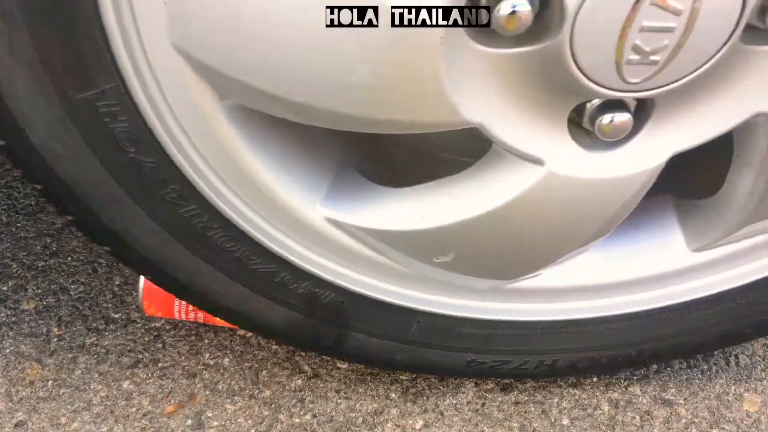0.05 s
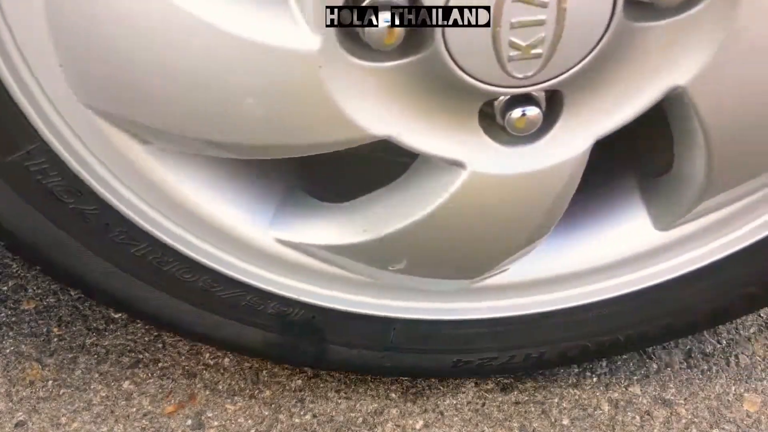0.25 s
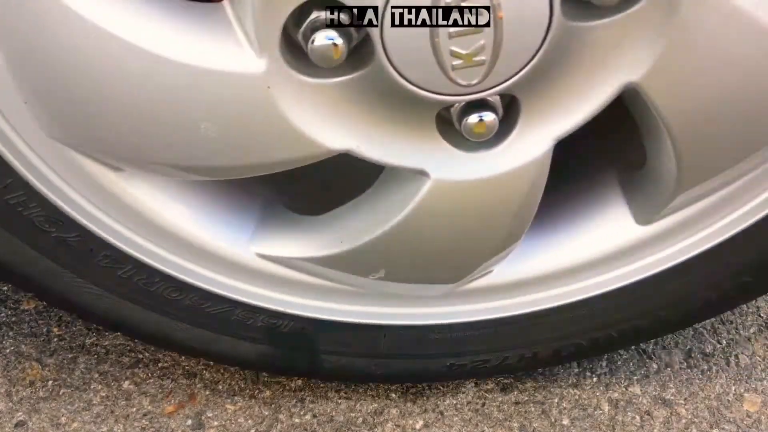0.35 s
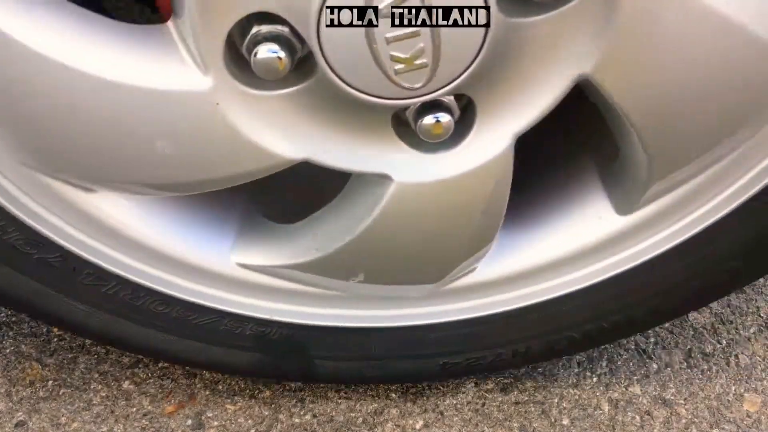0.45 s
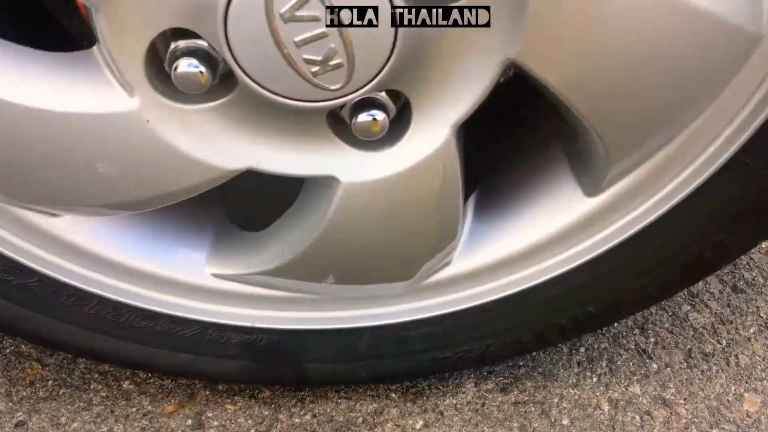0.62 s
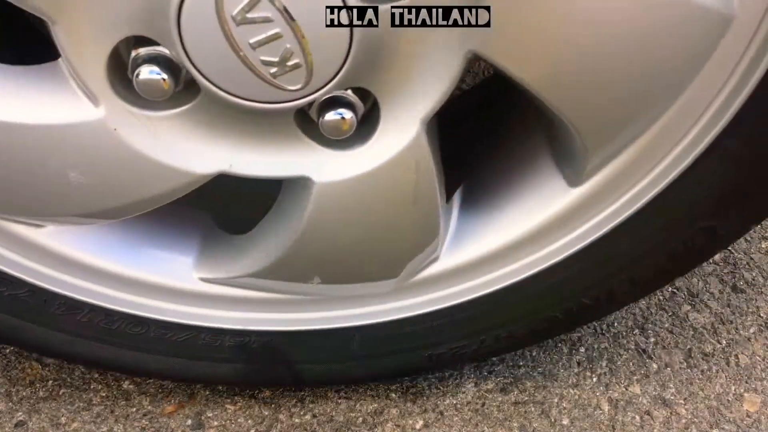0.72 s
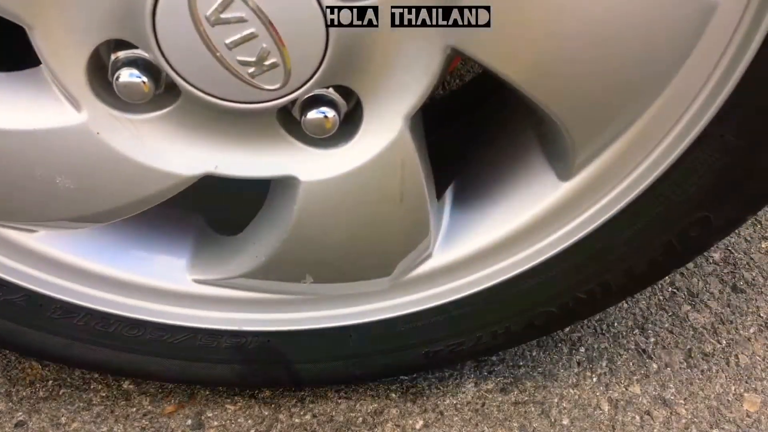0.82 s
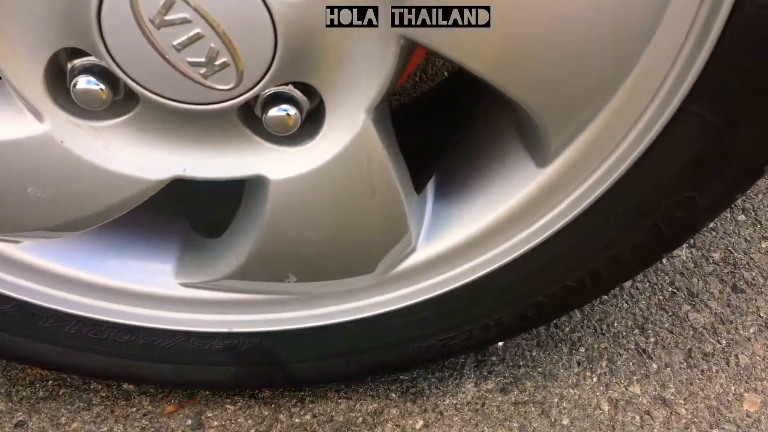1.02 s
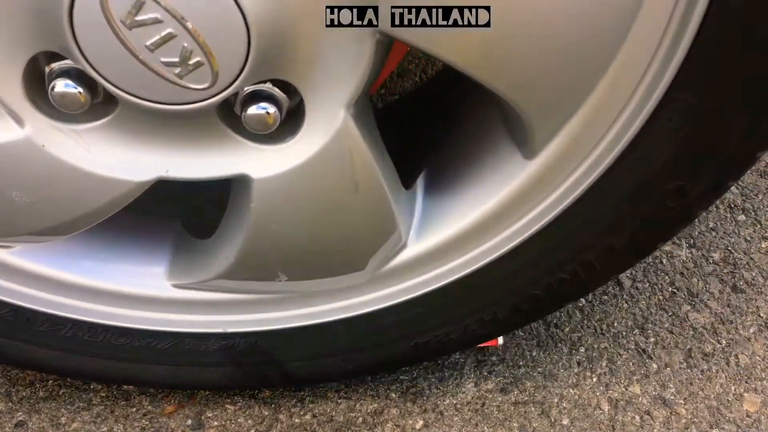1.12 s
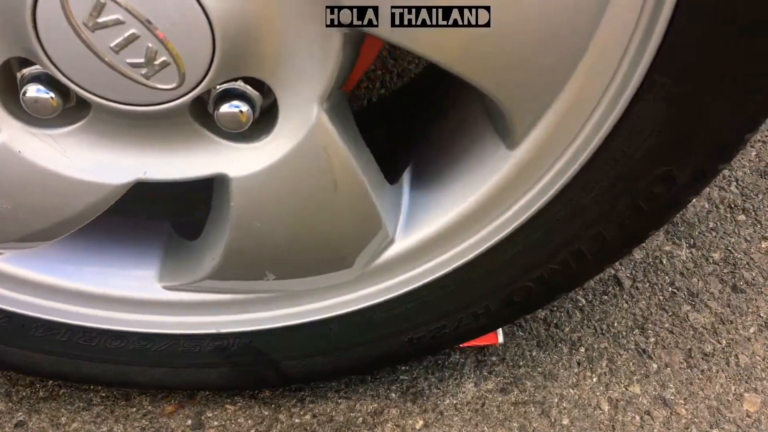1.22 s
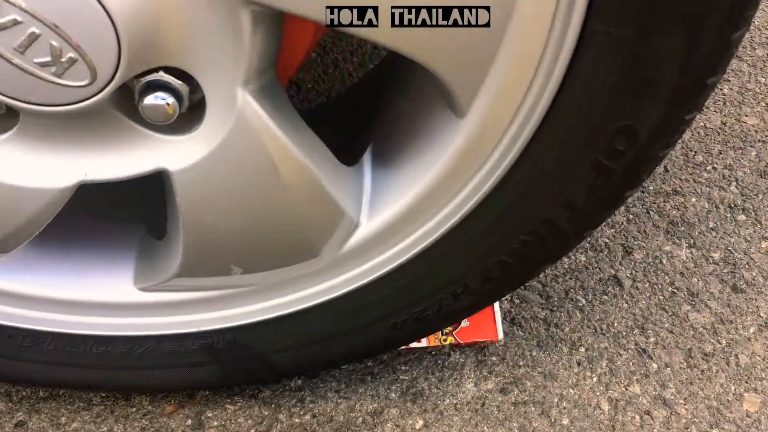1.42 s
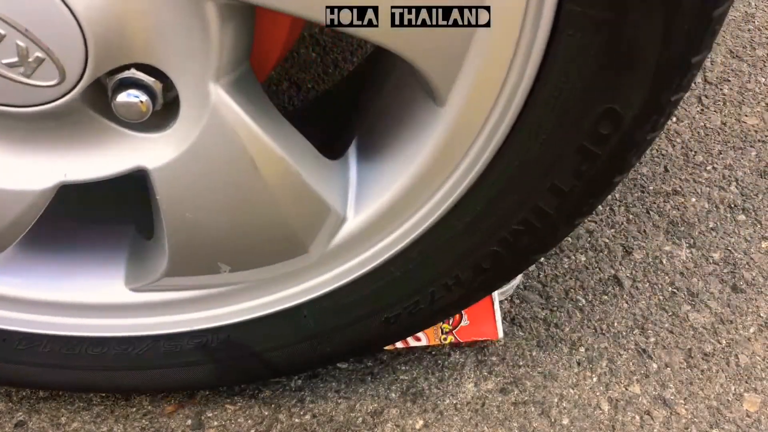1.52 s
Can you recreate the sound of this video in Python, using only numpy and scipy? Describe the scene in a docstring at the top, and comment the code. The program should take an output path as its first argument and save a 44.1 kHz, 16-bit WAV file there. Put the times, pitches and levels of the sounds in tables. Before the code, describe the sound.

Close beside a wheel on asphalt, a tyre squeezes a sealed packet; air rushes out ever harder, it bursts with a hard thump, then faint tread noise, grit and scattered crisp snaps follow over low rumble.

```python
"""Slow tyre on a sealed packet

A car tyre rolls slowly over a sealed packet on asphalt. The packet creaks (decaying resonant noise) and gives
a gulp (a rising sine); air hisses out of a seam ever harder (coloured and resonant noise). The walls cave in
with a few quick thumps (pressure pulses) that ring tyre and packet (damped modes). The tread rolls on over
grit (noise and random grains) and the crackling flattened packet, above the low rumble of the car."""
import sys
import numpy as np
from scipy import signal
from scipy.fft import rfft, irfft
from scipy.io import wavfile

SR = 44100
rng = np.random.default_rng(int(sys.argv[2]) if len(sys.argv) > 2 else 0)


def wrap_up_sound(samples):
    """Save the sound to the file named by the first command line argument, as 16-bit audio."""
    columns = np.atleast_2d(samples).T
    # keep every value between -1 and 1, then stretch to whole-number steps
    tamed = np.clip(columns, -1, 1)
    steps = np.round(tamed * 32767).astype(np.int16)
    wavfile.write(sys.argv[1], SR, steps)


N = 68355

# pressure pulses of the buckling walls: centre_s, peak_db, sigma_ms
BUCKLES = [(0.1146, -30, 0.64), (0.3542, -4, 0.15), (.3581, -8.5, 0.37), (0.3638, -6.5, 0.083),
           (0.3673, -4.5, 0.45), (0.374, -14.5, 0.48), (0.3903, -22, 0.48), (0.4041, -18.5, 0.71),
           (0.4113, -20, 0.73), (0.4463, -29, .6), (1.1066, -29.5, 0.24)]
# damped modes of tyre and packet: pitch_hz, level_db, t60_s
BODY_MODES = [(84.5, -29.5, 0.38), (140, -31, 0.13), (163, -25, 0.24), (203.5, -15, 0.13), (264, -24, 0.91),
              (301.3, -18.5, 0.13), (448.3, -18, 0.096), (520, -47, 0.029), (760, -18, 0.11),
              (1105, -8.5, 0.072), (1320, -8, 0.022), (2350, -5.5, 0.029)]
# spectrum of the tearing noise: frequency_hz, level_db
TEAR_SPECTRUM = [(200, -9), (1000, 16.5), (2400, 3.5), (4500, -15), (8000, -14), (16000, -13)]
# air leaving the seam: time_s, jet_db, whistle_db, seam_ringing_db
LEAK_LEVELS = [(0, -61, -82, -61), (.13, -48, -74, -53.5), (.19, -38.5, -41, -43.5), (.25, -32.5, -35, -41),
               (.31, -28.5, -33, -27.5), (.348, -28.5, -29, -31), (.372, -39, -39, -44),
               (.39, -49, -58, -60), (.415, -81, -83, -83)]
# broad spectrum of the air jet: frequency_hz, level_db
JET_SPECTRUM = [(150, -15), (500, -6.5), (1300, -6), (2000, -1.5), (3300, 0.5), (4500, -5.5), (5600, -4),
                (6700, 2.5), (7700, 0), (8700, 6.5), (10700, -8), (11300, -1.5), (13000, -2.5), (16000, -3)]
# resonances of the seam: pitch_hz, half_width_hz (of each of two stages), level_db
SEAM_MODES = [(1865, 66, -0.5), (3195, 180, -2.5), (3960, 206, 4), (5000, 63, 2.5), (6770, 70, -5),
              (7060, 45, 0), (8490, 42, -6), (8910, 160, -3.5), (9830, 200, 2.5), (10530, 80, 5),
              (10930, 98, -2)]
# top whistle of the seam: pitch_hz, half_width_hz (of each of two stages), level_db
WHISTLE_MODES = [(13900, 220, 1), (14700, 260, 3), (15400, 300, -13)]
# cracks of packet and grit: start_s, rattle_db, pitch_hz, decay_s, snap_db (relative to the rattle)
CRACKS = [(0.06, -38, 1970, 0.0096, -18), (.072, -31.5, 1790, 0.0078, -4),
          (0.0774, -33.5, 1840, 0.0064, -14), (0.094, -37, 1820, 0.0056, -14),
          (.114, -38, 1280, 0.0082, -18), (0.3666, -31.5, 5470, 0.0018, 3),
          (0.3825, -35.5, 2060, 0.0085, -15), (0.436, -44, 930, 0.023, 2),
          (0.5442, -52.5, 1290, 0.0033, 7.5), (0.7034, -43.5, 3100, 0.0066, -20),
          (0.793, -48, 2630, 0.016, 6), (.810, -49, 3000, 0.0041, 8.5), (0.8237, -43, 3070, .005, -8),
          (0.8383, -46, 3100, 0.026, -1), (0.8596, -42, 2900, 0.0069, -1), (0.985, -45, 2970, 0.0096, -19),
          (1.0757, -39, 1160, 0.0074, -22), (1.1053, -32, 1430, 0.0041, -13),
          (1.108, -36.5, 1080, 0.012, -30), (1.1514, -38.5, 2040, 0.007, 0), (1.2121, -28, 1920, .004, 0),
          (1.2185, -38, 1760, 0.014, -5), (1.271, -47.5, 3060, 0.011, -10),
          (1.4107, -44.5, 2930, .008, -18)]
# spectrum of a snap: frequency_hz, level_db
SNAP_SPECTRUM = [(300, -9), (1800, 0.5), (3900, 3.5), (5500, -10), (10000, -8), (16000, -10)]
# loudness of the rolling noise as heard, lower after the burst and back up near 0.7 s: time_s, level_db
ROLLING_NOISE_LEVELS = [(0, -44.5), (.1, -42.5), (.3, -46.5), (.42, -48.5), (.48, -49), (.6, -53.5),
                        (.655, -54), (.7, -45), (.85, -46), (.9, -48.5), (1.12, -45), (1.3, -47),
                        (1.42, -47.5), (1.55, -48)]
# spectrum of the tread: frequency_hz, level_db
TREAD_SPECTRUM = [(150, 7.5), (350, 1.5), (450, 6.5), (540, 2), (800, 1.5), (1000, -3), (1280, 5),
                  (1500, -2.5), (2200, -5.5), (3200, -7.5), (5000, -10.5), (7000, -17.5), (16000, -20.5)]
# spectrum of the grit: frequency_hz, level_db
GRIT_SPECTRUM = [(500, 17), (1500, -29.5), (3300, 12), (6000, -0.5), (16000, -39)]
# spectrum of the car's rumble: frequency_hz, level_db
RUMBLE_SPECTRUM = [(20, 0), (55, 1.5), (85, 3.5), (115, -3), (145, -2), (220, -4.5), (320, -17.5),
                   (700, -42.5)]

BUCKLE_LOW_HZ = 75
REBOUND_DB, REBOUND_DELAY_SIGMAS = -11, 3.1
TEAR_DB, TEAR_DECAY_S, TEAR_LEAD_S = -21.5, 0.0087, 0.00113
TEAR_GROWTH = 1.45  # dB of tear per dB of push
SEAM_FLICKER_DB, SEAM_FLICKER_PER_S = 5, 40
GULP_START_S, GULP_LENGTH_S = 0.1125, 0.0405
GULP_START_HZ, GULP_OCTAVES_PER_S = 212.5, 29
GULP_DB, GULP_FADE_DB_PER_S, GULP_OVERTONE_DB = -27.5, 74, -21
GULP_ATTACK_S, GULP_RELEASE_S = 0.0026, 0.0025
CRACK_RELATIVE_WIDTH, SNAP_DECAY_S = 0.38, 0.002
FLUTTER_DB, FLUTTER_PER_S = 1.5, 35.17
GRIT_PER_S, GRIT_SPREAD_DB, GRIT_DB, GRIT_DECAY_S = 710, 6.5, -12, 0.0031
RUMBLE_DB = -47.5
MIC_LOW_HZ, TOP_HZ = 29.2, 15900


def undb(db):
    """Level in decibels as an amplitude ratio."""
    return 10 ** (np.asarray(db) / 20)


def unit(x):
    """Normalisation to an rms of 1."""
    return x / np.sqrt(np.mean(x ** 2))


def clock():
    """Time of every sample in seconds."""
    return np.arange(N) / SR


def curve(table, column=1):
    """Amplitude envelope, interpolated linearly in dB over time."""
    rows = np.array(table)
    return undb(np.interp(clock(), rows[:, 0], rows[:, column]))


def colour(x, spectrum):
    """Spectral shaping, interpolated in dB over log frequency, to an rms of 1."""
    hz, db = np.array(spectrum).T
    bins_hz = np.maximum(np.fft.rfftfreq(N, 1 / SR), 1)
    gain = undb(np.interp(np.log(bins_hz), np.log(hz), db))
    return unit(irfft(rfft(x) * gain, N))


def resonate(x, hz, width):
    """Two-pole resonance with a gain of 1 at its centre; Q is at least 0.5."""
    b, a = signal.iirpeak(hz, max(hz / width, .5), fs=SR)
    return signal.lfilter(b, a, x)


def fade(start, decay):
    """Sudden onset and exponential decay."""
    age = clock() - start
    return (age >= 0) * np.exp(-np.maximum(age, 0) / decay)


def ring(x, response):
    """Linear response: convolution with an impulse response."""
    return signal.fftconvolve(x, response)[:N]


def noise():
    """White Gaussian noise."""
    return rng.standard_normal(N)


def walk(rate):
    """Random fluctuation: lines between Gaussian values drawn at a rate per second."""
    return np.interp(clock() * rate, np.arange(N), noise())


def band(hz, half_width):
    """Noise narrowed by two resonances in cascade, which steepens the flanks."""
    once = resonate(noise(), hz, 2 * half_width)
    return resonate(once, hz, 2 * half_width)


def collapse():
    """Impulsive excitation: a pressure pulse with a rebound; tearing starts just before; the pulse rings modes."""
    t = clock()
    ms = 1e-3
    push, rebound, tear_envelope = np.zeros(N), np.zeros(N), np.zeros(N)
    for centre_s, peak_db, sigma_ms in BUCKLES:
        age = (t - centre_s) / (sigma_ms * ms)  # in sigmas of the pulse
        push -= undb(peak_db) * np.exp(-.5 * age ** 2)
        rebound += undb(peak_db + REBOUND_DB) * np.exp(-.5 * (age - REBOUND_DELAY_SIGMAS) ** 2)
        tear_envelope += undb(TEAR_GROWTH * peak_db) * fade(centre_s - TEAR_LEAD_S, TEAR_DECAY_S)
    high_pass = signal.butter(1, BUCKLE_LOW_HZ, "high", fs=SR, output="sos")
    thump = signal.sosfilt(high_pass, push + rebound)
    modes = sum(undb(db - 60 * t / t60) * np.cos(2 * np.pi * hz * t) for hz, db, t60 in BODY_MODES)
    ringing = ring(push, modes) / (SR * ms)  # convolution integral with time in ms
    tear = tear_envelope * colour(noise(), TEAR_SPECTRUM)
    return thump + ringing + undb(TEAR_DB) * tear


def leak():
    """Turbulence and resonance: a swelling air jet rings the flapping seam and whistles at the very top."""
    rings = np.zeros(N)
    for hz, half_width, db in SEAM_MODES:
        flicker_db = SEAM_FLICKER_DB * walk(SEAM_FLICKER_PER_S)
        rings += undb(db + flicker_db) * band(hz, half_width)
    whistle = sum(undb(db) * band(hz, half_width) for hz, half_width, db in WHISTLE_MODES)
    jet = colour(noise(), JET_SPECTRUM) * curve(LEAK_LEVELS)
    whistle = unit(whistle) * curve(LEAK_LEVELS, column=2)
    rings = unit(rings) * curve(LEAK_LEVELS, column=3)
    return jet + whistle + rings


def gulp():
    """Cavity resonance: a shrinking pocket of air rings at a quickly rising pitch."""
    age = np.maximum(clock() - GULP_START_S, 0)
    held = np.minimum(age, GULP_LENGTH_S)  # stops the rise when the release begins
    pitch_hz = GULP_START_HZ * 2 ** (GULP_OCTAVES_PER_S * held) * (age > 0)
    phase = 2 * np.pi * np.cumsum(pitch_hz) / SR
    attack = np.minimum(age / GULP_ATTACK_S, 1)
    release = np.exp((held - age) / GULP_RELEASE_S)
    level = undb(GULP_DB - GULP_FADE_DB_PER_S * held)
    tone = np.sin(phase) + undb(GULP_OVERTONE_DB) * np.sin(2 * phase)
    return -level * attack * release * tone


def cracks():
    """Sudden release: creases snap and stones slip, a bright snap with a short rattle around one pitch."""
    out = np.zeros(N)
    snap = colour(noise(), SNAP_SPECTRUM)
    for start_s, rattle_db, hz, decay_s, snap_db in CRACKS:
        narrow = resonate(noise(), hz, CRACK_RELATIVE_WIDTH * hz)
        rattle = unit(resonate(narrow, hz, 2 * hz)) * fade(start_s, decay_s)
        out += undb(rattle_db) * (rattle + undb(snap_db) * snap * fade(start_s, SNAP_DECAY_S))
    return out


def rolling():
    """Friction and random impacts: tread rubs on asphalt and crunches small grit."""
    tread = colour(noise(), TREAD_SPECTRUM) * undb(FLUTTER_DB * walk(FLUTTER_PER_S))
    hits = rng.random(N) < GRIT_PER_S / SR
    strength = undb(GRIT_SPREAD_DB * np.minimum(rng.exponential(size=N), 5))
    grains = hits * strength * np.sign(noise())
    grain_response = noise() * fade(0, GRIT_DECAY_S)
    grit = colour(ring(grains, grain_response), GRIT_SPECTRUM)
    return curve(ROLLING_NOISE_LEVELS) * (tread + undb(GRIT_DB) * grit)


def rumble():
    """Steady broadband excitation: low-coloured noise for the car."""
    return undb(RUMBLE_DB) * colour(noise(), RUMBLE_SPECTRUM)


def scene():
    """Superposition of all sources, as heard from close beside the wheel."""
    mix = collapse() + leak() + gulp() + cracks() + rolling() + rumble()
    return mix[None, :]


def record(dry):
    """Band limiting: the microphone loses the deepest bass and the recorder cuts the top."""
    high_pass = signal.butter(2, MIC_LOW_HZ, "high", fs=SR, output="sos")
    low_pass = signal.ellip(10, .2, 80, TOP_HZ, fs=SR, output="sos")  # 0.2 dB ripple, 80 dB stopband
    return signal.sosfilt(low_pass, signal.sosfilt(high_pass, dry))


dry = scene()
out = record(dry)
wrap_up_sound(out)
```